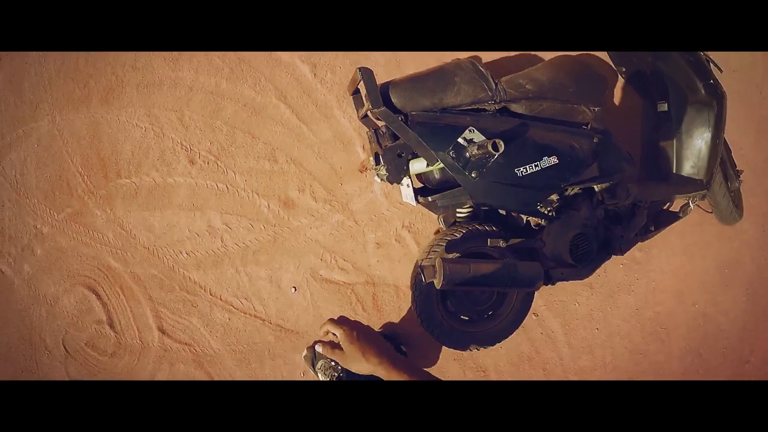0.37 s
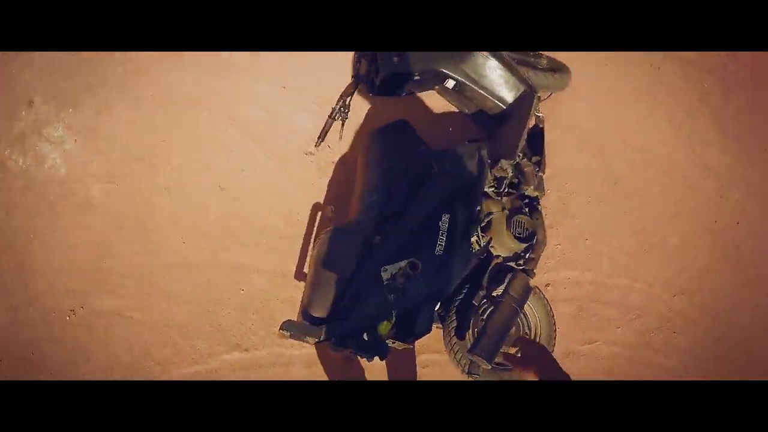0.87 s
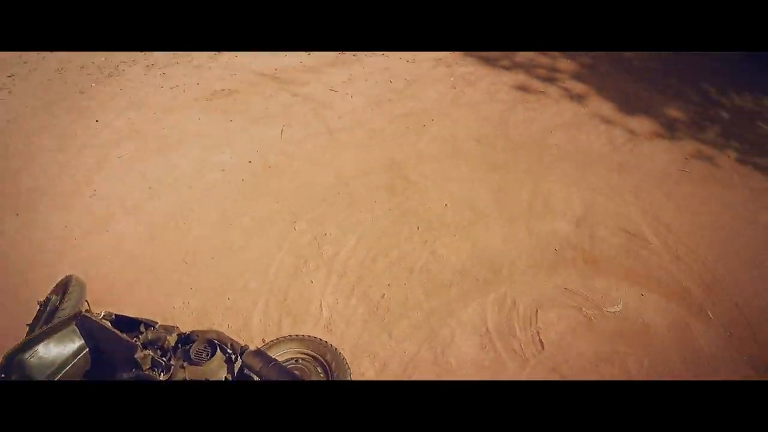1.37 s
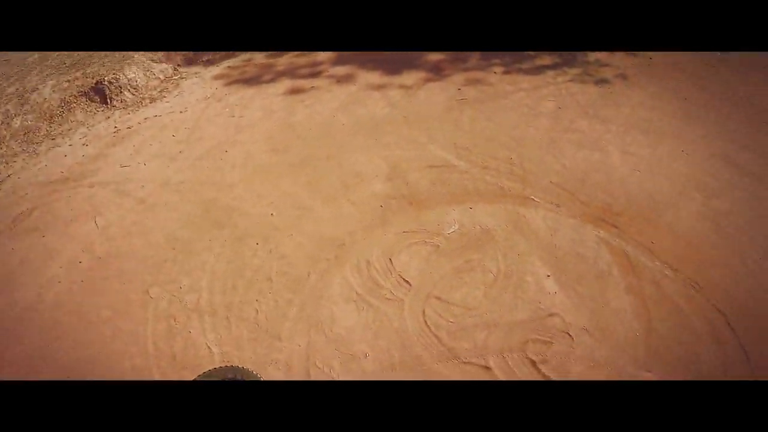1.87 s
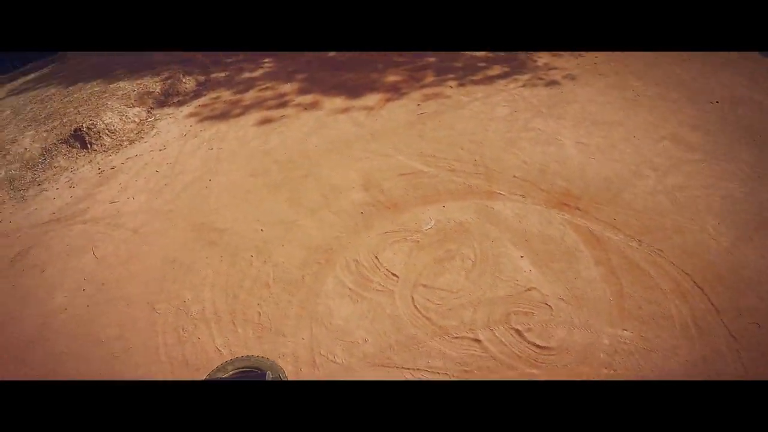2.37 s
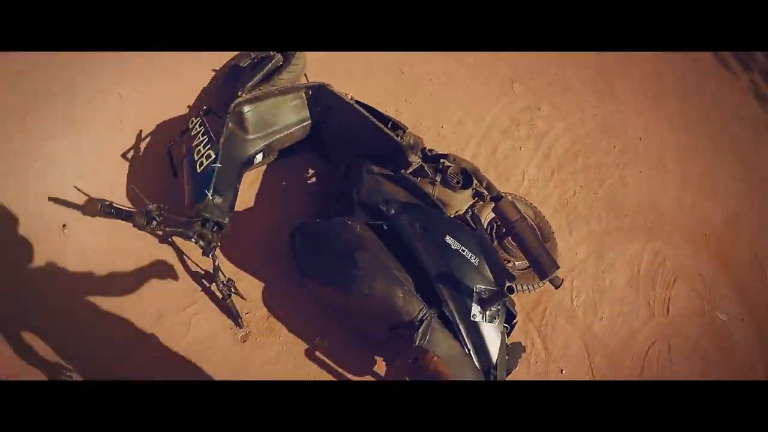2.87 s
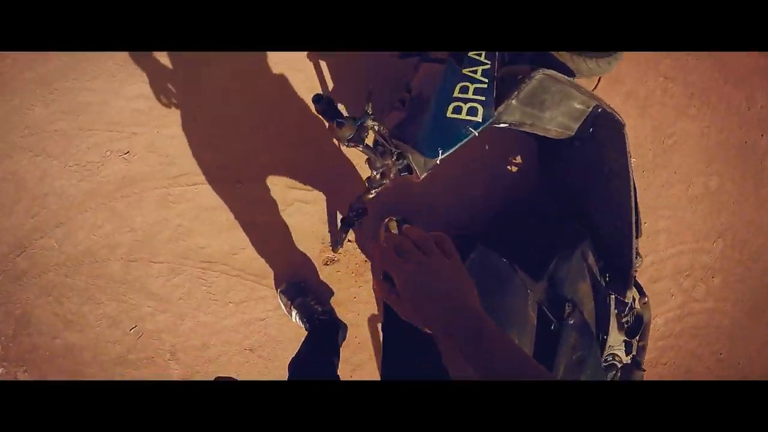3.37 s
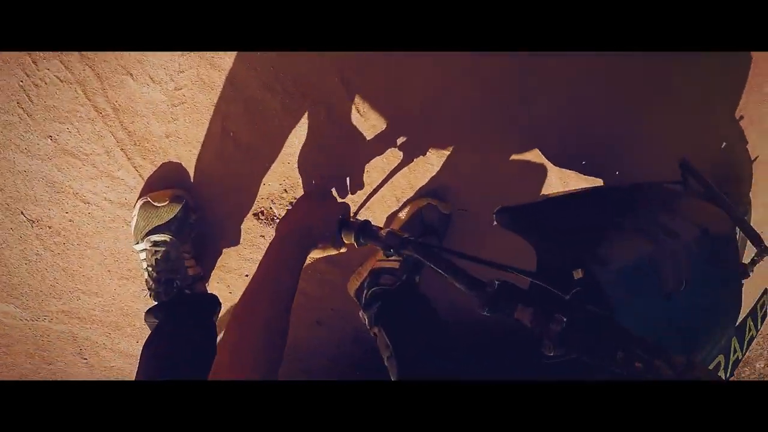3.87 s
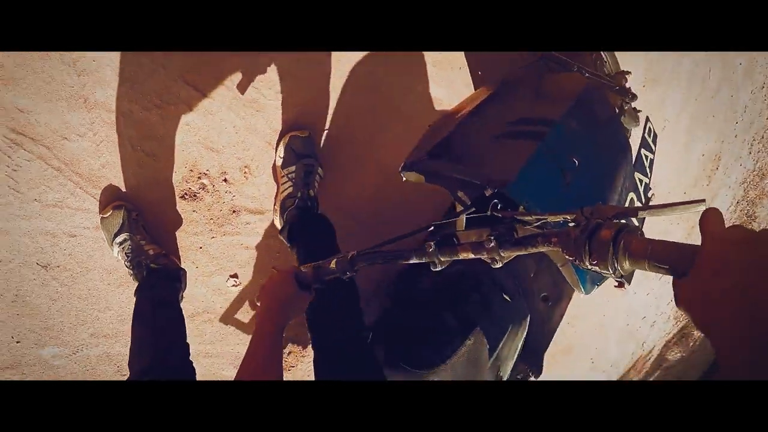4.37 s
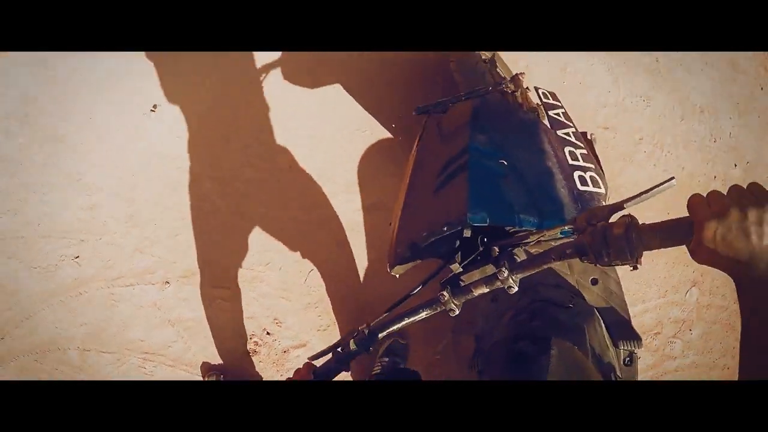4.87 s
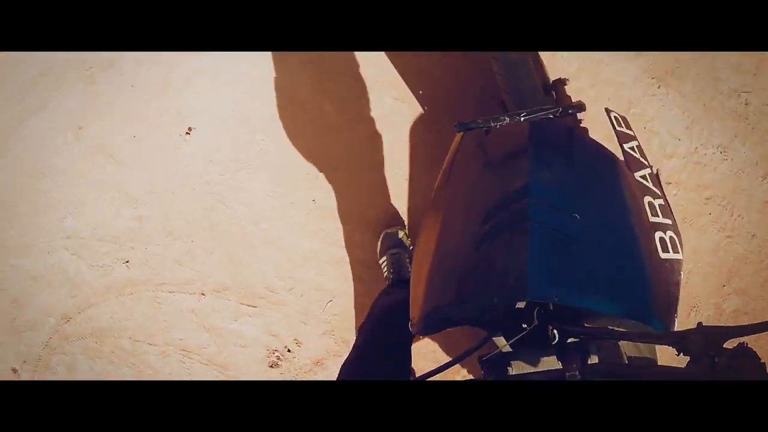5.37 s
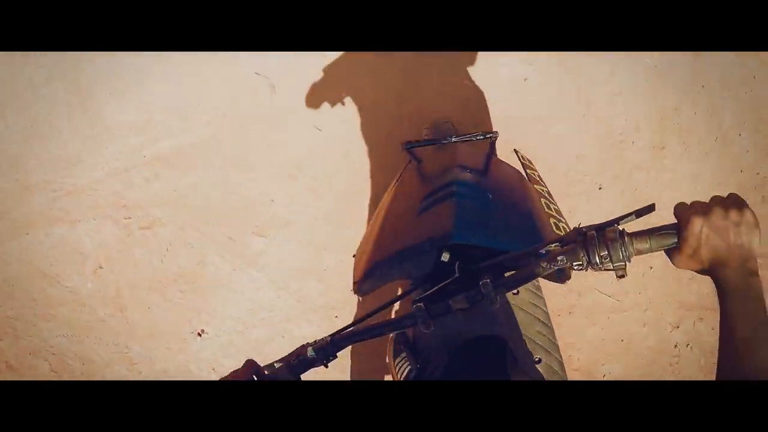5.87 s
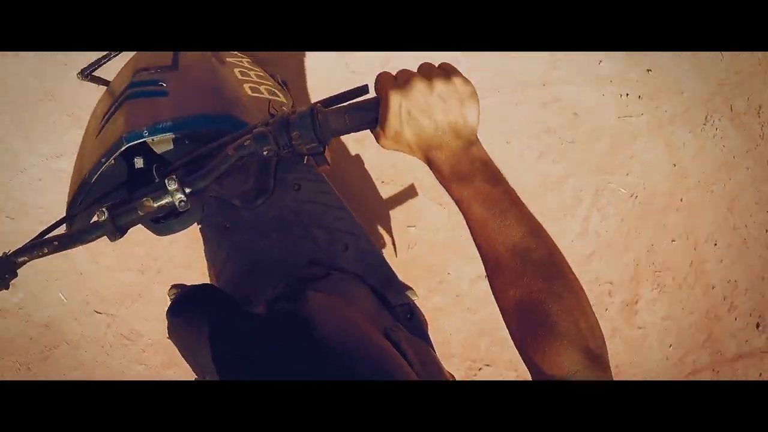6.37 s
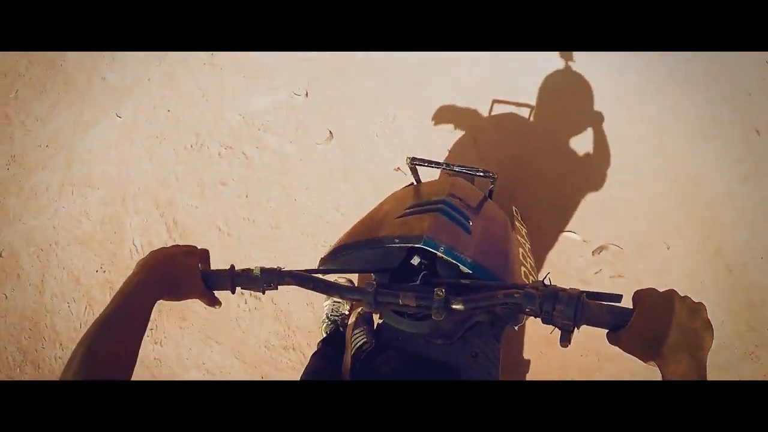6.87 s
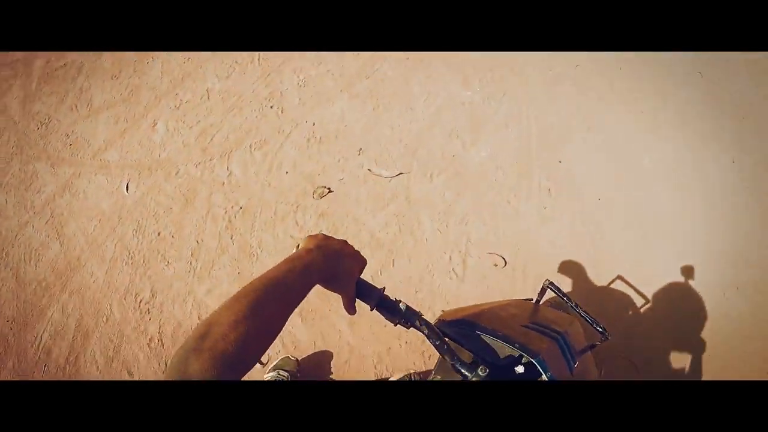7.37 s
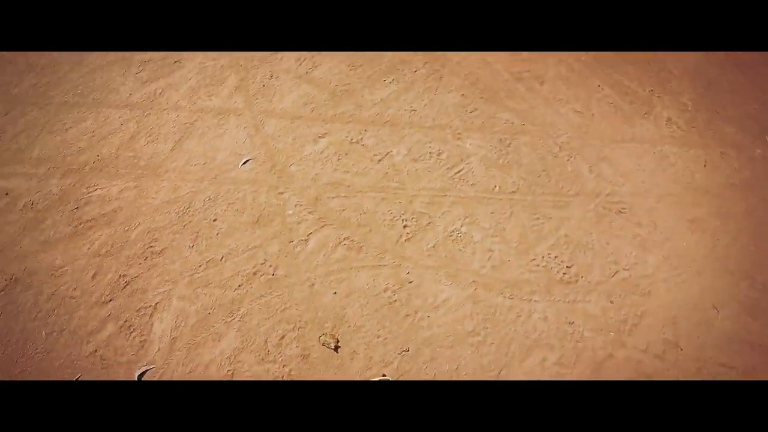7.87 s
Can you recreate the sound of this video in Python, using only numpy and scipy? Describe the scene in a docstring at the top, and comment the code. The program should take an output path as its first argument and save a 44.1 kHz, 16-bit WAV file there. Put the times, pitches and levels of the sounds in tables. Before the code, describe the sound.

Close, dry putt-putt idle of a little motor scooter, loose clacks and lever clicks, one barking rev, then uneven slowing and a slight final pickup.

```python
"""Open dirt ground: a small single-cylinder scooter idles on its side, is lifted by the handlebars and revved once.
It slows again and picks up at the very end. Firing pulses ring silencer and tail pipe modes; valve closings ring metal.
Shaped noise gives gas hiss, intake snort, rubbing, wind and microphone self-noise; bursts and struck modes give
clicks and mount knocks. Heard at the two ports of a helmet camera, whose stereo narrows to mono in the middle."""
import sys
import numpy as np
from scipy import signal
from scipy.io import wavfile

SR = 44100
rng = np.random.default_rng(int(sys.argv[2]) if len(sys.argv) > 2 else 0)


def level_to_linear(level):
    """Convert decibel levels to linear amplitude factors, elementwise."""
    exponent = np.asarray(level, float) / 20
    return 10 ** exponent


def pcm_store(signal):
    """Save signal as 16-bit PCM."""
    levels = np.round(np.clip(np.atleast_2d(signal), -1, 1) * 32767)
    wavfile.write(sys.argv[1], SR, levels.astype(np.int16).T)


N = 363806


def rms_one(x):
    """Normalisation: divide by the root mean square."""
    return x / np.sqrt(np.mean(x ** 2) + 1e-20)


def in_time(rows):
    """Linear interpolation: each column of a curve table, sample by sample."""
    s, *columns = np.transpose(rows)
    return [np.interp(np.arange(N) / SR, s, c) for c in columns]


def impulses(times, sizes):
    """Impulsive excitation: a train of one-sample clicks."""
    out = np.full(N, 1e-18)
    at = np.round(np.asarray(times) * SR).astype(int)
    inside = (at >= 0) & (at < N)
    np.add.at(out, at[inside], np.asarray(sizes)[inside])
    return out


def ring(excitation, hz, t60):
    """Damped resonance: a unit click starts a sine of height 1 that decays 60 dB in t60 seconds."""
    r, w = level_to_linear(-60 / (t60 * SR)), 2 * np.pi * hz / SR
    return signal.lfilter([0, np.sin(w)], [1, -2 * r * np.cos(w), r * r], excitation)


def cut(x, hz, kind, order=2):
    """Frequency selection: Butterworth filter."""
    return signal.sosfilt(signal.butter(order, hz, kind, fs=SR, output="sos"), x)


def drift(rate):
    """Random modulation: normal values at rate knots per second, joined by straight lines."""
    knots = rng.standard_normal(400)
    return np.interp(np.arange(N) / SR * rate, np.arange(400), knots)


def hiss(spectrum, alike, patchy_db):
    """Band-limited noise: third-octave bands of stereo noise, each flickering on its own; rms 1."""
    hz, level_db = np.transpose(spectrum)
    # the outermost rows only shape the slope; the bands lie between their neighbours
    bands = round(3 * np.log2(hz[-2] / hz[1]))
    edges = np.geomspace(hz[1], hz[-2], num=bands + 1)
    white, out = rng.standard_normal((2, 2, N)), 0
    side_gain = np.sqrt((1 - alike) / (1 + alike))
    for k, (low, high) in enumerate(zip(edges, edges[1:])):
        mid, side = cut(white[k % 2], [low, high], "band")
        band_db = np.interp(np.log(low * high) / 2, np.log(hz), level_db)
        gain = level_to_linear(band_db + patchy_db * drift(14))
        out = out + gain * (mid + side_gain * side * [[1], [-1]])
    return rms_one(out)


def swells(rows, rest_db):
    """Envelope: dB level climbs straight to each peak and sinks again, over a resting level."""
    foot_db = -18.5   # relative to the peak, one rise before it and one fall after it
    t = np.arange(N) / SR
    levels = [rest_db + 0 * t]
    for s, db, rise, fall in rows:
        levels.append(db + foot_db * np.maximum((s - t) / rise, (t - s) / fall))
    return np.max(levels, axis=0)


# engine speed: (time [s], firing rate [1/s])
SPEED_CURVE = [(0.0, 15.96), (0.78, 16.69), (0.93, 16.14), (1.66, 16.83), (2.06, 15.65), (3.03, 15.41),
               (3.98, 14.45), (4.47, 11.91), (4.74, 11.51), (4.97, 19.92), (5.13, 29.57), (5.48, 34.31),
               (6.03, 30.51), (6.17, 31.35), (6.34, 22.84), (6.4, 27.54), (6.75, 22.31), (7.74, 17.78),
               (8.07, 19.2), (8.25, 23.69)]
# firings that burn unevenly and come off the beat: (time [s], thump change [dB], bark change [dB])
UNEVEN_BURNS = [(1.169, -10.5, 2), (1.652, -10, -9), (2.082, -9, -3), (3.512, 1, -4.5), (3.647, 2.5, -3),
                (3.712, 0.5, 0), (4.061, -7, -3.5), (4.129, -0.5, -8), (4.202, -9.5, -28), (4.36, -3.4, -8),
                (6.257, 1.3, -3.5), (6.337, -7, -9), (6.489, -4, -13), (6.525, -8.5, -20.5),
                (6.569, -5.5, -7), (6.606, -8.5, -9.5), (6.648, -4, -5.5), (6.693, -6.5, -14),
                (6.743, -.4, -8.5), (6.782, -7.5, -12.5), (6.827, -4.5, -9.5), (6.876, -0.5, -3.5),
                (6.919, -3.5, -5), (7.018, -4.5, -9), (7.065, -2.5, -6.5), (7.12, -5.5, -12.5),
                (7.205, -2.5, -10), (7.256, -2.5, -4.5), (7.307, -2.5, -1), (7.364, -2.5, -10.5),
                (7.463, -2.5, -7), (7.567, -1.5, -17), (7.681, -1, -6)]
FIRST_FIRING_S = .005


def firings(offset=0.):
    """Periodic source: times at a given share of each four-stroke cycle; uneven burns keep their own times."""
    turned = np.cumsum(in_time(SPEED_CURVE)[0]) / SR
    turned = turned - turned[round(FIRST_FIRING_S * SR)]
    times = np.interp(np.arange(int(turned[-1]) + 1), turned, np.arange(N) / SR)
    times[[np.abs(times - row[0]).argmin() for row in UNEVEN_BURNS]] = [row[0] for row in UNEVEN_BURNS]
    return np.interp(np.arange(len(times)) + offset, np.arange(len(times)), times)


def burns():
    """Source strength: time, thump and bark change, rate above mid revs and random spread of each firing."""
    burn_spread_db, mid_revs_per_s = 1.8, 24   # spread at the slowest firing
    times = firings()
    burn_db = np.zeros((len(times), 2))
    burn_db[[np.abs(times - row[0]).argmin() for row in UNEVEN_BURNS]] = np.array(UNEVEN_BURNS)[:, 1:]
    per_s = 1 / np.gradient(times)
    spread_db = burn_spread_db * (per_s.min() / per_s) ** 2   # the burn steadies as the revs rise
    return times, burn_db[:, 0], burn_db[:, 1], per_s - mid_revs_per_s, spread_db


# exhaust strength, relative: (time [s], thump [dB], silencer boom [dB], tail pipe bark [dB])
EXHAUST_LOAD = [(0, -5, -16, -25.5), (.98, -5.5, -16.5, -29.5), (1.47, -5.5, -17.5, -27.5),
                (1.71, -10.5, -20, -29), (2.1, -9, -34, -26.5), (2.5, -8, -26, -22), (2.98, -7, -25, -17.5),
                (3.3, -4.5, -42, -21.5), (4.06, -2.5, -32.5, -19), (4.7, -1.5, -25, -25.5),
                (5.0, -4.5, -49.5, -16), (5.2, -5.5, -48.5, -9.5), (5.56, -6, -10, -15),
                (5.76, -7, -32.5, -14.5), (6.12, -6, -32, -16), (6.6, -2.5, -31, -23.5),
                (7.15, -5, -38, -18.5), (7.35, -5, -27.5, -17), (7.95, -5, -21, -24), (8.25, -4, -25, -15)]
# silencer modes: (frequency [Hz], relative level [dB], t60 [s], gain per extra firing a second [dB],
# share of the bark's change in an uneven burn [ratio], signed factor [ratio])
SILENCER_MODES = [(129.7, 3, 0.081, 0, 0, 0.94), (91, -19.5, 0.17, 0.5, 0.02, 0.57),
                  (160, -18, 0.13, 0.5, 0.0087, 0.85), (203, -6, 0.035, 1.37, 0, -0.78),
                  (468, -13, 0.044, 0, 0.12, 0.71)]


def silencer():
    """Cavity resonance: each firing pushes a soft pulse that rings the silencer."""
    times, burn_thump_db, burn_bark_db, extra_rate, spread_db = burns()
    thump_db, boom_db, _ = in_time(EXHAUST_LOAD)
    chance = rng.standard_normal((len(times), len(SILENCER_MODES) + 2))
    # mixture left over from a poor burn goes off a little later in the pipe
    late = times + 0.01206 + .004 * chance[:, -1]
    left_over = 1.23 * (1 - level_to_linear(np.minimum(burn_bark_db, 0)))
    modes = 0
    for k, (hz, db, t60, db_per_rate, share, sign) in enumerate(SILENCER_MODES):
        size_db = db + burn_thump_db + share * burn_bark_db + db_per_rate * extra_rate
        size = sign * level_to_linear(size_db + spread_db * chance[:, k])
        modes = modes + ring(impulses(times, size) + impulses(late, size * left_over), hz, t60)
    boom = ring(impulses(times, level_to_linear(burn_bark_db + 1.4 * chance[:, -2])), 254, 0.057)
    thump = modes * level_to_linear(thump_db + 2.5) + boom * level_to_linear(boom_db + 7.0)
    thump = cut(cut(thump, [85, 290], "band"), 65, "high")
    return cut(thump, 900, "low") * level_to_linear([[-1.2], [1.2]])


# tail pipe modes: (frequency [Hz], relative level [dB], t60 [s], signed factor [ratio])
PIPE_MODES = [(357, 6.5, 0.11, 0.28), (400.6, -3, 0.078, 0.89), (472, 3.5, 0.05, 0.79),
              (538, -2.5, 0.2, 0.056), (674, -16, 0.038, 1), (812, -3.5, 0.072, 0.57),
              (1256, -1, 0.23, -1.4)]


def tail_pipe():
    """Pipe resonance: a sharper front barks ahead of the thump and reaches the right port 6 samples late."""
    lead_s, lead_per_rate_s = .0014, .00005   # longer lead at high revs
    times, _, burn_bark_db, extra_rate, spread_db = burns()
    chance = rng.standard_normal((len(times), len(PIPE_MODES) + 1))
    fronts = times - lead_s - lead_per_rate_s * extra_rate
    bark = 0
    for k, (hz, db, t60, sign) in enumerate(PIPE_MODES):
        size_db = db + burn_bark_db + spread_db * (chance[:, k] + chance[:, -1])
        bark = bark + ring(impulses(fronts, sign * level_to_linear(size_db)), hz, t60)
    bark = cut(cut(bark, 250, "high"), 610, "low", order=4)
    bark = bark * level_to_linear(in_time(EXHAUST_LOAD)[2] - 4.0) + second_puff()
    far_port = np.r_[np.zeros(6), bark[:-6]]
    return np.array([bark, far_port])


def second_puff():
    """Delayed excitation: where the silencer booms, a second short puff follows each firing."""
    delay_s = 0.016
    times, _, burn_bark_db, _, _ = burns()
    chance = rng.standard_normal((len(times), 2))
    second = impulses(times + delay_s + .001 * chance[:, 0], level_to_linear(burn_bark_db + 5.7 * chance[:, 1]))
    puff = ring(second, 340, .04) + level_to_linear(-3.5) * ring(second, 440, 0.018)
    return cut(puff, [250, 560], "band") * level_to_linear(in_time(EXHAUST_LOAD)[1] - 8.5)


# panel ringing out when the body is gripped or shaken: (time [s], relative peak [dB], rise [s], fall [s])
PANEL_GRIPS = [(2.33, -46, .1, .15), (3.55, -45.5, 0.34, 0.73), (4.07, -48, .1, 0.16),
               (4.71, -47, 0.13, .3), (5.17, -41, 0.52, 0.14), (5.81, -47, 0.15, .08),
               (6.27, -41.5, 0.29, 0.082), (6.5, -41, 0.17, .15)]


def panel():
    """Sympathetic vibration: a body panel sings along, shaken unevenly by every firing."""
    panel_hz, panel_t60_s, rest_db = 982, .11, -64.5
    times = firings()
    shaking = impulses(times, rng.standard_normal(len(times))) + 0.054 * rng.standard_normal(N)
    return ring(shaking, panel_hz, panel_t60_s) * level_to_linear(swells(PANEL_GRIPS, rest_db) + 4.0)


def gas_puff():
    """Amplitude modulation: a smooth swell after each firing, shared by the hisses."""
    times = firings()
    return cut(ring(impulses(times, np.ones(len(times))), 20.8, 0.1), 150, "low")


# engine noise reaching the helmet as head and scooter turn, relative:
# (time [s], engine case [dB], valve side treble [dB], valve tick [dB])
HELMET_REACH = [(0, -46, -48.5, -57.5), (.62, -45.5, -48, -58), (1.39, -48, -50.5, -55.5),
                (1.72, -56, -58.5, -62), (2.2, -53, -61.5, -66.5), (2.5, -46.5, -59.5, -61.5),
                (3.14, -42, -56, -55), (3.36, -41, -54.5, -57), (3.6, -44.5, -62, -71),
                (4.25, -49.5, -61, -97), (4.55, -48, -62, -70), (4.72, -38.5, -55.5, -70),
                (4.87, -47.5, -70.5, -68.5), (5.17, -43, -68, -66.5), (5.35, -45, -69.5, -74.5),
                (5.75, -49, -72.5, -73), (6.0, -48, -69.5, -71), (6.7, -52.5, -75.5, -78),
                (7.7, -55, -66, -81.5), (8.25, -53, -66.5, -70)]
# gas hiss spectrum: (frequency [Hz], relative density [dB per Hz])
GAS_SPECTRUM = [(120, -30), (200, -3.5), (281, -13), (483, -18.5), (724, -25), (1260, -25.5), (1800, -33.5),
                (2340, -79.5), (3960, -120)]


def gas_hiss():
    """Flow noise: gas hiss rides on the case level, grows with the bark and swells after each firing."""
    case_db, bark_db = in_time(HELMET_REACH)[0], in_time(EXHAUST_LOAD)[2]
    gas_db = case_db + 13.0 + .15 * (bark_db - bark_db.mean())
    return hiss(GAS_SPECTRUM, alike=0.38, patchy_db=1.2) * (1 + 1.1 * gas_puff()) * level_to_linear(gas_db)


def valves(modes, spread_db):
    """Impact excitation: two valve closings a cycle, the second weaker, each a short rasp that rings the metal."""
    times = np.r_[firings(.09), firings(.58)]
    base_db = np.repeat([0, -4.0], len(times) // 2)
    chance = rng.standard_normal((len(times), len(modes) + 1))
    closings = times + 0.0024 * chance[:, -1]
    rasp = np.hanning(round(0.0066 * SR))
    out = 0
    for k, (hz, db, t60) in enumerate(modes):
        strikes = impulses(closings, level_to_linear(db + base_db + spread_db * chance[:, k]))
        envelope = signal.fftconvolve(strikes, rasp, "same")
        out = out + ring(rng.standard_normal(N) * envelope, hz, t60)
    return rms_one(out)


# engine case modes struck by the valves: (frequency [Hz], relative level [dB], t60 [s])
CASE_MODES = [(2250, -13, 0.027), (2440, -6.5, 0.015), (2934, 0.5, 0.027), (3320, -5, 0.02),
              (3700, -20, 0.065), (4180, -14, 0.15)]
# case hiss spectrum: (frequency [Hz], relative density [dB per Hz])
CASE_SPECTRUM = [(1060, -30), (1800, -1), (2410, 2), (2740, -9), (3370, 2.5), (5000, -24), (6500, -54),
                 (11000, -120)]


def engine_case():
    """Structure-borne sound: pulsing case hiss with its thin top, and case modes struck by the valves."""
    case_db, puff = in_time(HELMET_REACH)[0], gas_puff()
    case = hiss(CASE_SPECTRUM, alike=0.93, patchy_db=1.2) * (1 + 0.96 * puff)
    case = case + level_to_linear(-9.5) * valves(CASE_MODES, spread_db=3.0)
    white = rng.standard_normal(N) + .6 * rng.standard_normal((2, N))
    top = rms_one(cut(cut(white, [7800, 12500], "band"), 7500, "low")) * (1 + 2.0 * puff)
    return case * level_to_linear(case_db - 2.0) + top * level_to_linear(case_db - 22.0)


# valve side treble spectrum: (frequency [Hz], relative density [dB per Hz])
TREBLE_SPECTRUM = [(2940, -35), (5000, -2), (6650, -5.5), (7810, -12), (8600, -16.5), (9690, -18.5),
                   (12100, -33), (15000, -58)]


def valve_treble():
    """Modulated noise: treble from the valve side swells after each firing, stronger on the right."""
    treble = hiss(TREBLE_SPECTRUM, alike=0.61, patchy_db=2.5) * (1 + 0.94 * gas_puff())
    return treble * level_to_linear([[-1.0], [1.2]]) * level_to_linear(in_time(HELMET_REACH)[1] - 1.0)


# cylinder head modes: (frequency [Hz], relative level [dB], t60 [s])
HEAD_MODES = [(6040, -3, 0.018), (6500, -10, 0.048), (8300, -13, 0.0045), (12400, -13.5, .003)]


def valve_ticks():
    """Modal ringing: the valves strike the head into high, short ticks."""
    return valves(HEAD_MODES, spread_db=2.0) * level_to_linear(in_time(HELMET_REACH)[2] + 2.0)


def intake_snort():
    """Turbulence noise: the intake rasps at each firing while the revs climb."""
    gain_db, full_climb_per_s2, lead_s, t60_s = 18, 40, .006, .06   # gain over the case curve
    times = firings() - lead_s
    decay = signal.lfilter([1], [1, -level_to_linear(-60 / (t60_s * SR))], impulses(times, np.ones(len(times))))
    noise = cut(rng.standard_normal(N), [1600, 3300], "band", order=4)
    climb = np.clip(np.gradient(in_time(SPEED_CURVE)[0]) * SR / full_climb_per_s2, 0, 1)
    return cut(decay, 140, "low") * noise * level_to_linear(in_time(HELMET_REACH)[0] + gain_db) * climb


# knocks on the camera mount, relative: (time [s], clack [dB], thud [dB])
MOUNT_KNOCKS = [(.135, -6.5, -31), (.174, -11.5, -22), (.248, -9, -16.5), (.687, -11, -44),
                (0.724, -10, -18.5), (.788, -8, -18), (1.087, -13.5, -24), (1.174, -11, -20.5),
                (1.263, -11.5, -21.5), (1.448, -8, -13), (1.542, -8.5, -20.5), (1.573, -5, -16.5),
                (1.59, -8, -18), (1.605, -5, -42), (1.617, -12.5, -10), (1.766, -16, -22),
                (1.981, -10.5, -20.5), (2.09, -11, -17), (2.331, -4.5, -14), (2.411, -7.5, -37),
                (2.63, -5, -11.5), (3.142, -10, -18.5), (3.218, -4, -15.5), (3.3, -19, -14.5),
                (3.489, -9, -14.5), (3.61, -10, -7), (3.63, 3, -6.5), (3.651, -34, -30), (4.091, -6, -24),
                (4.813, -40, -14), (4.824, 4, -6), (5.703, -34, -11.5), (5.813, -23, -10.5),
                (6.337, -19, -17), (7.305, -14.5, -12), (7.767, -5.5, -11)]


def mount():
    """Modal impact: a knock shakes the ports in opposite senses and the shell booms, more on the left."""
    s, clack_db, thud_db = np.transpose(MOUNT_KNOCKS)
    hit = impulses(s, level_to_linear(clack_db))
    clack = ring(hit, 370, 0.041) + level_to_linear(-2.5) * ring(hit, 610, 0.013)
    clack = clack + level_to_linear(-17.5) * ring(hit, 770, 0.016) + level_to_linear(-35.5) * ring(hit, 1500, 0.02)
    hit = impulses(s, level_to_linear(thud_db))
    thud = ring(hit, 165, 0.22) + level_to_linear(0.5) * ring(hit, 192, 0.12)
    thud = thud + level_to_linear(-0.5) * ring(hit, 118, 0.17) + level_to_linear(-5.0) * ring(hit, 310, 0.081)
    return cut(clack, 2000, "low") * [[-.85], [1.15]] + cut(thud, 350, "low") * level_to_linear([[2.5], [-3.5]])


# clicks of levers, grips and panels; crack and woody knock are relative to the click's own pitch:
# (time [s], peak of the pitched part [dB], its centre [Hz], crack [dB], woody knock [dB])
LEVER_CLICKS = [(1.448, -29, 1180, -8.5, -15), (1.5928, -31, 1470, -16, -5), (1.6015, -30, 1000, -14, -4),
                (1.9768, -27.5, 1080, -21, -13), (2.09, -35, 1110, -22, -8), (2.3275, -20, 1420, -22, -21),
                (2.4081, -12.5, 1450, -21, -20), (2.633, -21, 1150, -17, -15), (2.6648, -28, 990, -23, -8),
                (2.9331, -21, 920, -27.5, -24), (3.2183, -25.5, 1210, -20, -6),
                (3.2925, -15, 2120, -19, -28), (3.3027, -13.5, 1320, -1, -20), (3.487, -14, 1360, -22, -14),
                (3.5121, -27, 1170, -2.5, -4), (3.6073, -17, 1083, -33, -6), (3.944, -31.5, 1320, -29, -25),
                (4.0235, -34, 1000, -5, -19), (4.6577, -19, 1270, -21, -17), (4.6878, -22, 1010, -22, -10),
                (4.7016, -18.5, 1600, -8.5, -1.5), (4.7502, -17, 2190, -7, -9),
                (4.8212, -16.5, 1480, -32, 4), (5.8042, -18.5, 980, -10, 1), (5.8232, -24.5, 1330, -12, 3),
                (5.9482, -30, 1014, -10, -1), (5.9731, -25, 940, 2.5, -26), (6.377, -27, 1060, -7.5, 3.5),
                (6.4143, -28.5, 1220, -7.5, 6.5), (7.2999, -31.5, 980, -24.5, -3),
                (7.7629, -31, 1380, -20, 3), (8.0493, -43, 964, -14, -3)]


def handling():
    """Transient noise: each burst has its own pitch, a brief crack with a faint bright edge and a woody knock."""
    out, t = np.zeros(N + SR), np.arange(SR // 5) / SR
    for s, db, hz, crack_db, wood_db in LEVER_CLICKS:
        noise = rng.standard_normal(len(t)) * np.minimum(t / .0035, 1) ** 2
        # level [dB], band [Hz], t60 [s]
        parts = [(0, [hz / 1.67, hz * 1.56], 0.041), (crack_db, [2700, 4400], .018),
                 (crack_db - 22, [5500, 9500], .015), (wood_db, [520, 900], .032)]
        for part_db, edges, t60 in parts:
            burst = cut(cut(noise * level_to_linear(-60 * t / t60), edges, "band"), edges, "band")
            out[round((s - .003) * SR):][:len(t)] += level_to_linear(db + part_db) * burst / np.abs(burst).max()
    return out[:N]


# hands and shoes rubbing: (start [s], end [s], rms before the fades [dB], centre [Hz])
RUBBING_STROKES = [(2.512, 2.608, -49, 1750), (3.237, 3.33, -44, 2120), (3.442, 3.464, -32.5, 1950),
                   (3.999, 4.031, -44, 3020), (4.06, 4.13, -35, 3070), (4.574, 4.794, -41, 2500),
                   (5.806, 5.835, -33, 2470), (5.938, 6.001, -43, 2830), (6.368, 6.453, -44.5, 2640),
                   (7.291, 7.32, -43, 2920)]


def rubbing():
    """Friction noise: dense grains of uneven size, swelling and fading over each stroke."""
    out = np.zeros(N)
    for start, end, db, hz in RUBBING_STROKES:
        length = round((end - start) * SR)
        sizes = level_to_linear(5.4 * np.minimum(rng.exponential(1, length), 3))
        grains = rng.standard_normal(length) * sizes * (rng.random(length) < .08)
        stroke = rms_one(cut(grains, [hz / 1.27, hz * 1.21], "band")) * np.hanning(length) ** 0.42
        out[round(start * SR):][:length] += level_to_linear(db) * stroke
    return out


# gusts on the ports: (time [s], relative peak [dB], rise [s], fall [s])
WIND_GUSTS = [(0, -12, .05, 0.049), (.14, -17.5, 0.11, 0.3), (.76, -16.5, 0.29, .12),
              (1.1, -17, 0.065, 0.47), (1.56, -18, .3, 0.3), (1.92, -20.5, 0.58, 0.38),
              (2.32, -16, 0.047, 0.18), (2.7, -13.5, 0.23, .2), (3.4, -22, 0.83, 0.077),
              (3.97, -17.5, 0.15, 0.18), (4.73, -23, 3.1, .15), (5.72, -23, 0.07, 0.22),
              (6.09, -20, .12, 0.16), (6.36, -20, 0.046, 0.13), (6.66, -24, 0.22, 1.7),
              (7.5, -23.5, 1.3, .25)]


def wind():
    """Turbulent pressure: gusts press a lumpy rumble on the ports, its own in each."""
    lump_spread_db, calm_db = 3.0, -36.5
    lumps = level_to_linear(lump_spread_db * np.array([drift(30), drift(5.6)]))
    rumble = cut(cut(rng.standard_normal((2, N)), 47, "low", order=3), 14, "high") * lumps
    return rms_one(rumble) * level_to_linear(swells(WIND_GUSTS, calm_db) + [[-4.0], [1.5]])


def microphone_noise():
    """Self-noise: the faint steady noise floor of the microphones, the same in both ports."""
    mic_noise_db = -75
    return rms_one(cut(rng.standard_normal(N), [7500, 10800], "band")) * level_to_linear(mic_noise_db)


def scene():
    """Superposition: all sources add at the two ports."""
    exhaust = silencer() + tail_pipe() + panel()
    engine = exhaust + gas_hiss() + engine_case() + valve_treble() + valve_ticks() + intake_snort()
    return engine + mount() + handling() + rubbing() + wind() + microphone_noise()


def band_limit(x):
    """A steep low-pass at the top of the band."""
    return signal.sosfilt(signal.butter(12, 15260, fs=SR, output="sos"), x)


# stereo width of the camera: (time [s], gain of the side signal [dB])
STEREO_WIDTH = [(0, 1.5), (1.7, 4), (2.3, -15), (2.9, -31), (3.3, -48), (6.9, -66.5), (7.0, -13),
                (7.4, -1.5), (7.8, 4.5), (8.25, 6)]


def record(dry):
    """Mid/side mixing and saturation: the camera folds the ports together for a while, rounds peaks, cuts the top."""
    mid = (dry[0] + dry[1]) / 2
    side = (dry[0] - dry[1]) / 2 * level_to_linear(in_time(STEREO_WIDTH)[0])
    rounded = 1.268 * np.tanh(np.array([mid + side, mid - side]) / 1.282)
    mix = cut(rounded, 15200, "low", order=8)
    return band_limit(mix)


dry = scene()
out = record(dry)
pcm_store(out)
```